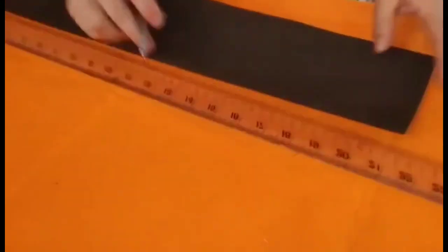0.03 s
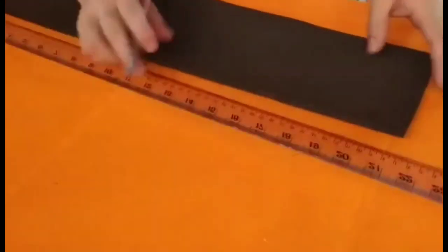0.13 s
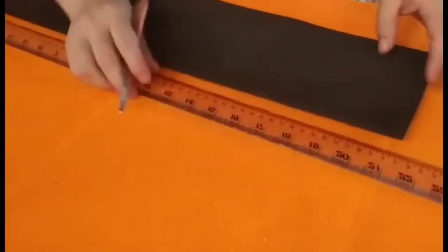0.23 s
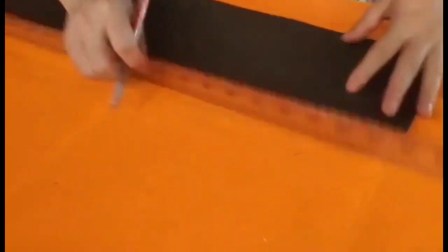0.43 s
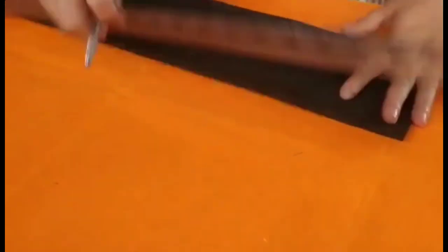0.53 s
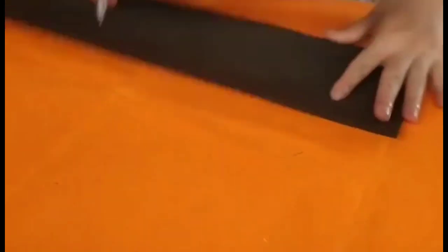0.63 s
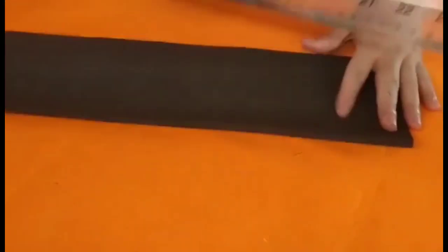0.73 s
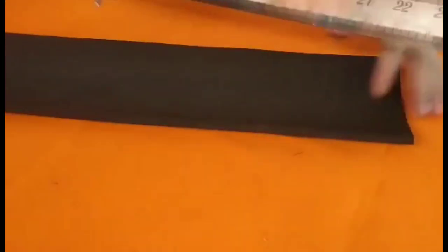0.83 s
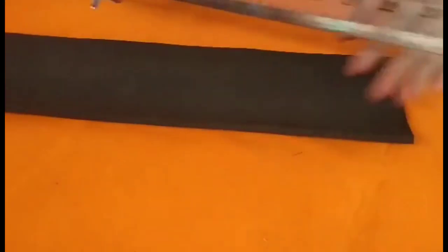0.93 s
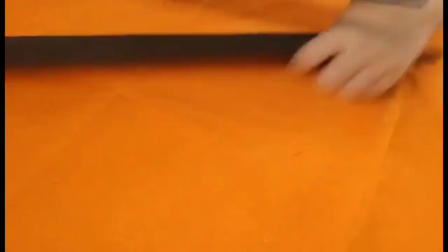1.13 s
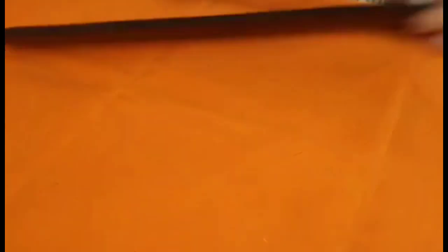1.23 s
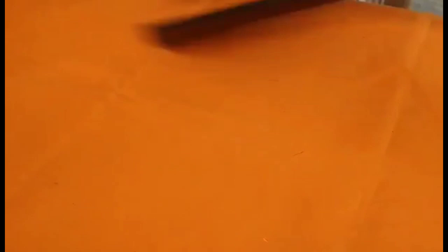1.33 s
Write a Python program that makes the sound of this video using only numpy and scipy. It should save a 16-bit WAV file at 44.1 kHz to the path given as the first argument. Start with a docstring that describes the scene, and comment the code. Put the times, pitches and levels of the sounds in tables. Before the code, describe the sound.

A ruler knocks loudly on a cloth-covered table at about 0.15 seconds, chattering and ringing briefly over a low boom that fades by 0.5. Hands faintly pat and brush a fabric strip until about 1 second. At 1.2 seconds the strip is pulled taut with a soft, low flutter and slides away with a light rasp. The sound is close, in a small room with faint rumble and a thin whine.

```python
"""A long ruler knocks on a cloth-covered table, chatters and rings until the hand damps it.
The table top booms under the knock, whose loudest peaks just overload the microphone.
Hands pat, brush and smooth a strip of fabric, its weave hissing and rasping with the friction,
then pull it taut with a soft flutter and slide it off.
Behind it all is a small room with a low rumble and a thin, steady whine."""
import sys
import numpy as np
from scipy import signal
from scipy.fft import rfft, irfft
from scipy.io import wavfile

SR = 44100
rng = np.random.default_rng(int(sys.argv[2]) if len(sys.argv) > 2 else 0)


def unload_audio(sound):
    """Save the sound as a 16-bit wav file, at the path given as the first command line argument."""
    columns = np.transpose(np.atleast_2d(sound))
    # keep every value between -1 and 1, then stretch to whole-number steps
    steps = np.round(np.clip(columns, -1, 1) * 32767)
    wavfile.write(sys.argv[1], SR, steps.astype(np.int16))


N = 61739
T = np.arange(N) / SR
HZ = np.fft.rfftfreq(N, 1 / SR)


def amp(db):
    """Decibels to gain."""
    return 10 ** (np.asarray(db) / 20)


def unit_rms(x):
    """Scales to rms 1."""
    return x / np.sqrt(np.mean(x ** 2) + 1e-20)


def curve_at(points, hz):
    """Reads a curve on a log-frequency axis."""
    freqs, values = np.transpose(points)
    return np.interp(np.log(hz + 1e-3), np.log(freqs), values)


def equalise(x, gain_db):
    """Shapes x with a gain at each frequency, then scales it to rms 1."""
    return unit_rms(irfft(rfft(x) * amp(gain_db), N))


def noise(spectrum):
    """Noise coloured by an EQ curve, at rms 1."""
    return equalise(rng.standard_normal(N), curve_at(spectrum, HZ))


def burst(start_s, decay_s, rise_s=0.00049):
    """Envelope with a quick attack and an exponential decay."""
    age = np.maximum(T - start_s, 0)
    return (1 - np.exp(-age / rise_s)) * np.exp(-age / decay_s)


def fuzzy_tone(pitch_hz, width_hz):
    """A narrow band of noise around a steady or gliding pitch."""
    lowpass_db = -20 * np.log10(1 + (HZ / width_hz) ** 3)
    wander_cos, wander_sin = (equalise(white, lowpass_db) for white in rng.standard_normal((2, N)))
    phase = 2 * np.pi * np.cumsum(pitch_hz * np.ones(N)) / SR
    return wander_cos * np.cos(phase) + wander_sin * np.sin(phase)


# Room tone EQ: freq_hz, gain_db
ROOM_TONE_EQ = [(15, 3.5), (35, 2.5), (60, -6.5), (120, -12), (250, -21.5), (450, -24.5), (800, -29),
                (2000, -31.5), (4000, -37), (7000, -49), (10000, -45), (14500, -44)]
# Level ride on the whine: time_s, gain_db
WHINE_RIDE = [(0, 4.5), (.12, -4), (.2, 4), (.33, 0), (.46, -4), (.66, -3.5), (.85, 0), (.97, 1),
              (1.08, -2.5), (1.2, -4), (1.4, -1)]


def room_tone(bed_db=-43, whine_db=-53):
    """A bed of rumble and hiss, with a thin whine that wavers in level."""
    ride_db = np.interp(T, *np.transpose(WHINE_RIDE))
    whine = amp(whine_db + ride_db) * fuzzy_tone(pitch_hz=5417, width_hz=198)
    return amp(bed_db) * noise(ROOM_TONE_EQ) + whine


def fibre_friction(catches_per_s=3000, spread_db=5, catch_share=0.4):
    """The grain of friction: many tiny catches of the weave in a smooth hiss."""
    sizes = amp(spread_db * np.minimum(rng.exponential(1, N), 4))
    catches = sizes * rng.choice([-1, 1], N) * (rng.random(N) < catches_per_s / SR)
    hiss = rng.standard_normal(N)
    return np.sqrt(catch_share) * unit_rms(catches) + np.sqrt(1 - catch_share) * hiss


# Body of the rub: multiple_of_centre, gain_db
RUB_EQ = [(.06, -9.5), (.15, -8), (.33, -12.5), (.6, -4.5), (.85, -3.5), (1, -2.5), (1.2, -5.5), (1.6, -12),
          (2.6, -21), (6, -37)]
# Airy top of the rub: freq_hz, gain_db
HISS_EQ = [(300, -12), (2000, -11.5), (4000, -6), (6500, -12), (8000, -3), (9500, 0), (11000, -1.5),
           (14500, -4.5), (16000, -28.5)]
# Hand strokes over the cloth: start_s, rise_s, hold_s, fall_s, rub_db, centre_hz, hiss_db
HAND_STROKES = [(-.02, 0.013, 0.0067, 0.06, -46.5, 1700, -68),
                (0.054, 0.012, 0.028, 0.27, -57.5, 2320, -59), (0.268, 0.038, 0.011, 0.053, -54, 2960, -84),
                (0.424, 0.0086, 0.0029, 0.015, -59, 2800, -58.5),
                (0.518, 0.01, 0.0089, 0.011, -52, 2900, -74), (0.523, 0.02, 0.053, 0.013, -62, 2830, -56.5),
                (0.688, 0.0033, 0.0089, 0.032, -46.5, 2450, -53),
                (0.7279, 0.0018, 0.0079, 0.0033, -41.5, 1600, -59),
                (0.729, .04, 0.097, 0.036, -44.5, 3360, -50.5),
                (0.788, 0.051, 0.056, 0.055, -45.5, 2630, -53.5),
                (1.014, 0.018, 0.011, 0.039, -60.5, 2000, -65),
                (1.198, 0.02, 0.0033, 0.011, -44, 2380, -54.5),
                (1.211, 0.046, 0.029, 0.14, -43.5, 2680, -55), (1.239, 0.064, 0.09, 0.11, -47, 1620, -54),
                (1.287, 0.096, .04, .05, -56, 3000, -48)]


def cloth_strokes():
    """Each stroke swells, holds and fades with the hand's speed: a rubbing band under a fine hiss."""
    out = np.zeros(N)
    for start_s, rise_s, hold_s, fall_s, rub_db, centre_hz, hiss_db in HAND_STROKES:
        speed = np.interp(T - start_s, np.cumsum([0, rise_s, hold_s, fall_s]), [0, 1, 1, 0])
        rub = amp(rub_db) * equalise(fibre_friction(), curve_at(RUB_EQ, HZ / centre_hz))
        hiss = amp(hiss_db) * equalise(fibre_friction(), curve_at(HISS_EQ, HZ))
        out += speed * (rub + hiss)
    return out


# Dull tone of a pat: freq_hz, gain_db
PAT_EQ = [(40, 1), (150, -4.5), (400, -8), (800, -21), (2000, -19), (8000, -44)]
# Fingertip landings: start_s, level_db
FINGER_PATS = [(0.0, -37.5), (0.436, -51), (0.66, -52), (0.73, -47)]


def finger_pats():
    """Fingertips land softly on the covered table."""
    return sum(amp(level_db) * noise(PAT_EQ) * burst(start_s, decay_s=0.036, rise_s=0.0011)
               for start_s, level_db in FINGER_PATS)


# Bright attack of a contact: freq_hz, gain_db
CLACK_EQ = [(100, -35.5), (300, -9), (600, -4.5), (900, 3), (1500, -4.5), (2450, -4.5), (2950, -19),
            (3500, -20), (4600, -37), (8000, -51.5), (15000, -41.5)]
# The ruler's ring: pitch_hz, relative_db, t60_s
RULER_MODES = [(411, -2, 0.23), (529.7, -9.5, .22), (615, -9, 0.089), (761, -18, 0.2), (926.4, 3, 0.081),
               (970, -3.5, 0.12), (1064.4, -3, 0.18), (1199.5, -3, 0.073), (1321, 0.5, 0.055),
               (1494, -5.5, 0.07), (1740, -15, 0.037), (2004, -5, 0.034), (2253.3, -4.5, 0.037),
               (2483, -4.5, 0.045), (3404, -12.5, .08)]
# The knock and its chatter: start_s, relative_strike_db, thud_db, thud_pitch_hz
RULER_CONTACTS = [(0.1454, -4.5, -15.5, 324), (0.1485, 1.5, -8.5, 194), (0.1535, -6.5, -11.5, 213),
                  (0.158, -5, -9.5, 434), (0.1611, -11, -29, 200), (0.1649, -9.5, -2, 164.5),
                  (0.179, -12, -17.5, 196), (0.189, -23, -25, 124), (0.2017, -18.5, -11, 306),
                  (0.22, -16, -14.5, 343)]


def ruler_knock(clack_db=-5.5, ring_db=-17, thud_cycles=0.66, grip_s=0.2, grip_db_per_s=450):
    """Each contact clacks, thuds into the table and feeds the ruler's modes until the hand damps them."""
    clacks, thuds, ring, energy_in = np.zeros((4, N))
    for start_s, strike_db, thud_db, thud_hz in RULER_CONTACTS:
        clacks += amp(clack_db + strike_db) * noise(CLACK_EQ) * burst(start_s, decay_s=0.0062)
        cycles = (T - start_s) * thud_hz
        thuds += amp(thud_db) * np.sin(2 * np.pi * cycles) * np.exp(-(cycles / thud_cycles) ** 2)
        push = burst(start_s, decay_s=0.00017) ** 2
        energy_in += amp(strike_db) ** 2 * push / push.sum()
    grip = amp(-grip_db_per_s * np.maximum(T - grip_s, 0))
    for pitch_hz, mode_db, t60_s in RULER_MODES:
        kept_per_sample = np.exp(-2 * np.log(1000) / (t60_s * SR))
        swing = np.sqrt(signal.lfilter([1], [1, -kept_per_sample], energy_in))
        tone = np.sin(2 * np.pi * (pitch_hz * T + rng.random()))
        ring += amp(ring_db + mode_db) * grip * swing * tone
    reverb_send = amp(-9.5) * (clacks + ring) + amp(-13.5) * thuds
    return clacks + ring + thuds + room_reverb(reverb_send)


# Reverb time of the room: freq_hz, t60_s
ROOM_DECAY = [(100, 0.64), (300, 0.25), (1000, 0.26), (2500, 0.16), (8000, 0.24)]


def room_reverb(send, build_s=0.016):
    """Diffuse tail of a small room; the bass hangs on longest."""
    hz, time_s, bands = signal.stft(rng.standard_normal(SR // 2), SR, nperseg=256)
    decay = amp(-60 * time_s / curve_at(ROOM_DECAY, hz)[:, None])
    tail = signal.istft(bands * decay, SR, nperseg=256)[1]
    tail *= np.minimum(np.arange(len(tail)) / SR / build_s, 1)
    return signal.fftconvolve(send, tail / np.linalg.norm(tail))[:N]


# Low resonances of the table top: pitch_hz, relative_db, t60_s
TABLE_MODES = [(61.7, -6, 0.39), (110.5, -3.5, .4), (131.3, -9, .36), (174.05, 0, 0.27),
               (188.8, -2.5, 0.33)]


def table_boom(start_s=0.158, rise_s=0.034, level_db=-11.5):
    """The table top's modes swell under the knock and die away."""
    age = np.maximum(T - start_s, 0)
    swell = np.minimum(age / rise_s, 1)
    boom = sum(amp(mode_db - 60 * age / t60_s) * np.sin(2 * np.pi * pitch_hz * age)
               for pitch_hz, mode_db, t60_s in TABLE_MODES)
    return amp(level_db) * swell * boom


# Even slips of the weave: start_s, length_s, level_db, pitch_hz, glide_hz_per_s, width_hz
WEAVE_SLIPS = [(.515, 0.093, -59, 3000, -600, 200), (0.536, 0.083, -60, 9470, -2000, 900),
               (.818, 0.033, -46.5, 2350, 4000, 130), (1.265, 0.13, -41.5, 1580, -1100, 155)]


def thread_rasps():
    """Threads slipping past each other sing briefly, gliding in pitch as the slide changes speed."""
    out = np.zeros(N)
    for start_s, length_s, level_db, pitch_hz, glide_hz_per_s, width_hz in WEAVE_SLIPS:
        age = np.clip(T - start_s, 0, length_s)
        arch = np.sqrt(np.abs(np.sin(np.pi * age / length_s)))
        out += amp(level_db) * arch * fuzzy_tone(pitch_hz + glide_hz_per_s * age, width_hz)
    return out


# Air shed by each flap of the strip: freq_hz, gain_db
PUFF_EQ = [(60, -4), (150, 6), (230, 2.5), (350, -6.5), (550, -20.5), (1500, -41), (5000, -45)]


def fabric_tug(peak_s=1.1995, level_db=-16.5, pitch_hz=147.5, round_trip_s=0.0209):
    """The strip snaps taut and a wave runs to and fro: each return is a weaker low pulse and a puff."""
    pulse_width_s, puff_width_s, lag_cycles = 0.0031, 0.012, 0.2
    lead_s, snap_s = 0.0057, 0.0009
    air = amp(-17) * noise(PUFF_EQ)
    flutter = np.zeros(N)
    for trip in range(6):
        age = T - peak_s - trip * round_trip_s
        wave = np.cos(2 * np.pi * (pitch_hz * age - trip * lag_cycles))
        pulse = wave / np.cosh(np.clip(age / pulse_width_s, -20, 20))
        puff = air * np.exp(-(age / puff_width_s) ** 2)
        loss_db = 0.62 * trip ** 1.89
        flutter += amp(level_db - loss_db) * (puff - pulse)
    flutter *= 0.5 + 0.5 * np.tanh((T - peak_s + lead_s) / snap_s)  # hard attack just before the peak
    return flutter + amp(-14) * room_reverb(flutter)


def scene():
    """Mono mix of all sources at one close microphone."""
    mix = room_tone() + cloth_strokes() + finger_pats()
    mix += ruler_knock() + table_boom() + thread_rasps() + fabric_tug()
    return mix[None]


def record(dry, knee=10, cutoff_hz=14750):
    """The microphone soft-clips the loudest peaks at full scale; a low-pass trims the extreme top."""
    clipped = dry / (1 + np.abs(dry) ** knee) ** (1 / knee)
    lowpass = signal.firwin(255, cutoff_hz, window=("kaiser", 9), fs=SR)
    return signal.oaconvolve(clipped, lowpass[None], "same")


dry = scene()
out = record(dry)
unload_audio(out)
```